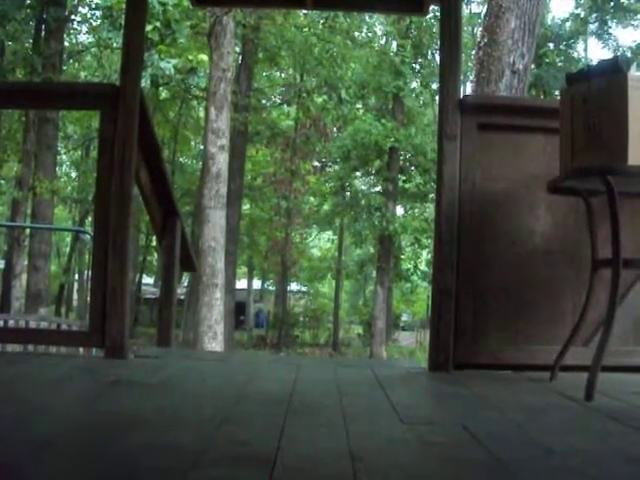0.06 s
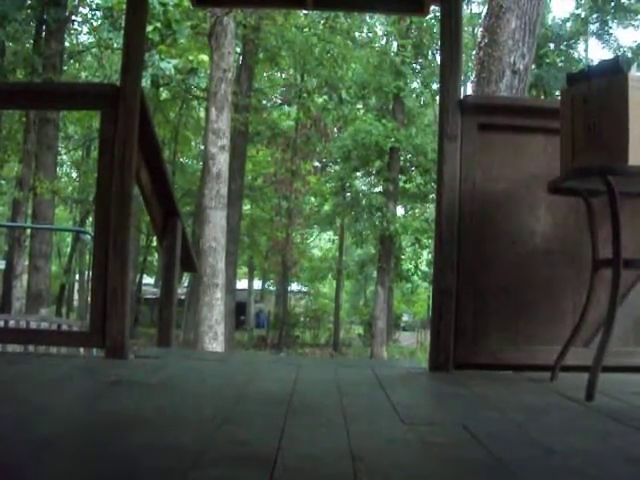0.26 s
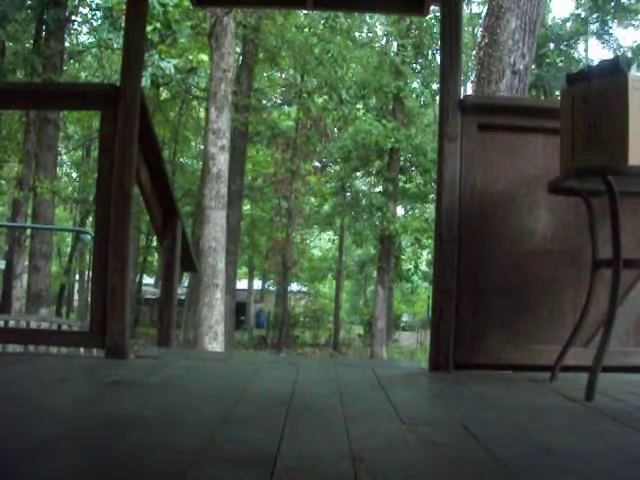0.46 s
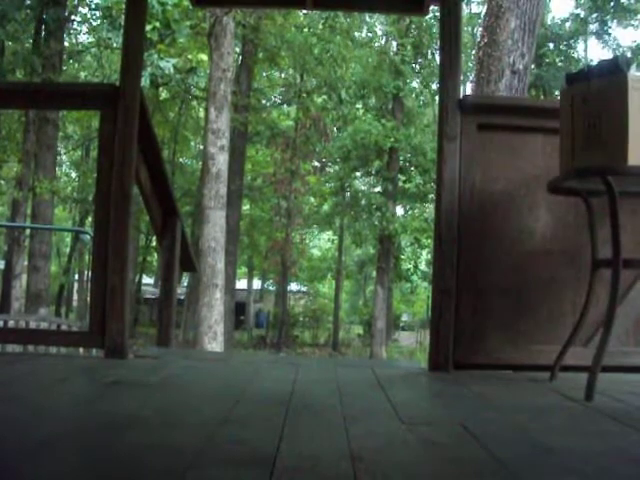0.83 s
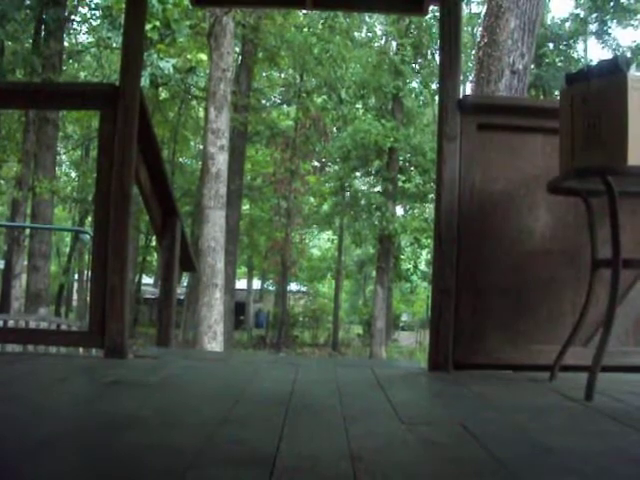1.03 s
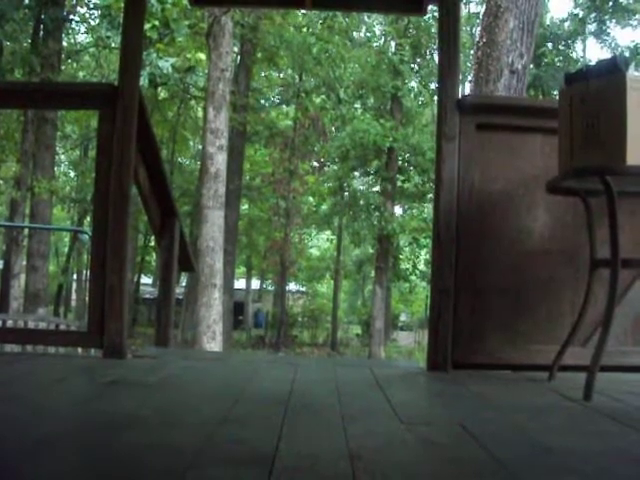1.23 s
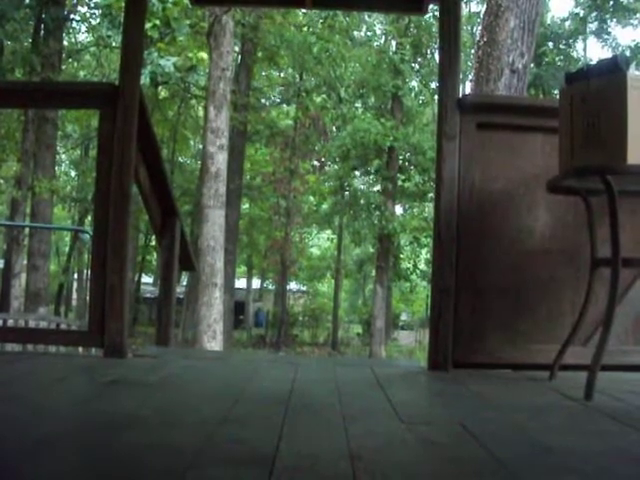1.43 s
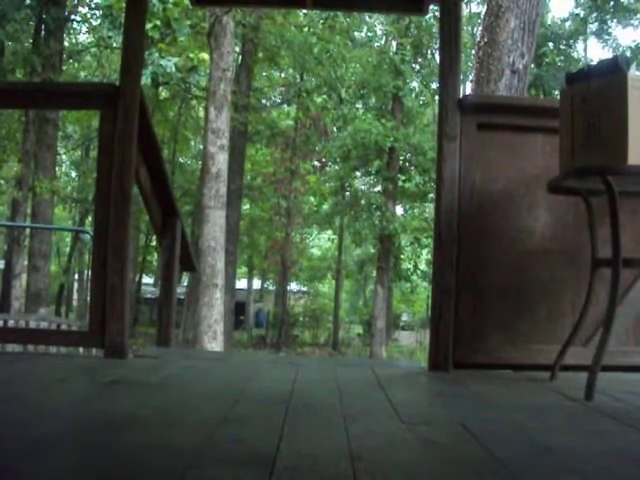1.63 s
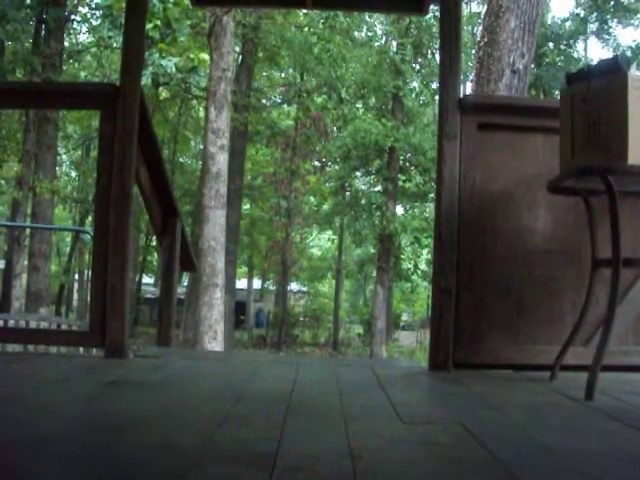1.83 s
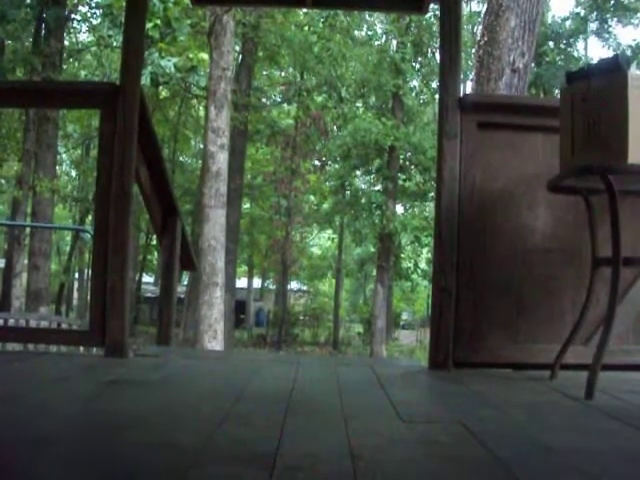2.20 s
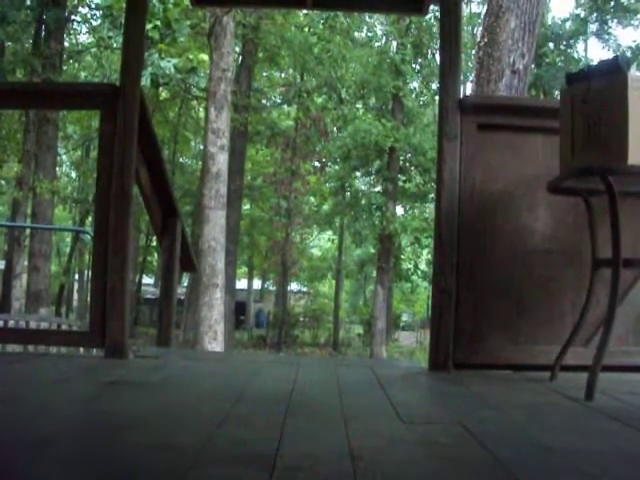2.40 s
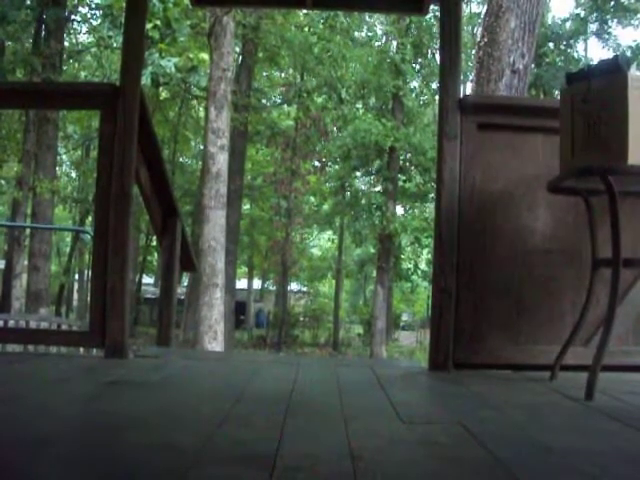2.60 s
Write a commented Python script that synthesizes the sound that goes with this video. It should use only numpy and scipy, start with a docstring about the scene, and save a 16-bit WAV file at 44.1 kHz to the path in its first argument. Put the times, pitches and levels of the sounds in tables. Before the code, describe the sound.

Steady rain washes and patters on trees beyond a porch, sounding dull, with low wind rumble on the microphone. Close rubbing and bumps start at 0.2 seconds. A hard knock at 0.5 seconds overloads and briefly dips the rain. Small taps follow at 1.0 and 1.3. At 1.5 a thump starts a rumbling rub that hisses until 2.2, then a quick swipe and bump come at 2.4.

```python
"""A wooden porch, with steady rain on the trees and yard beyond, heard through a dull little microphone.
Far drops merge into a wash, nearer ones patter, and a draught buffets the microphone.
Right at the microphone the camera is handled: its case knocks and thumps, and something rubs over it,
rumbling and then hissing away. The hardest knock overloads the recorder, whose gain control ducks
the rain for a moment."""
import sys
import numpy as np
from scipy import signal
from scipy.fft import rfft, irfft
from scipy.io import wavfile
from scipy.ndimage import uniform_filter1d

SR = 44100
rng = np.random.default_rng(int(sys.argv[2]) if len(sys.argv) > 2 else 0)


def persist_wave(psi):
    """Save psi, clipped to +-1, as 16-bit WAV."""
    counts = np.round(np.clip(psi, -1, 1) * 32767).astype(np.int16)
    wavfile.write(sys.argv[1], SR, np.atleast_2d(counts).T)


N = 121275
T = np.arange(N) / SR

# Spectra: f/Hz, relative level/dB
DRAUGHT_SPECTRUM = [(10, -13.5), (25, 0.5), (45, 0), (75, -1), (130, -6.5), (220, -20), (500, -52.5)]  # air buffeting the microphone
RAIN_SPECTRUM = [(88, -35.5), (150, -8), (227, -1), (253, -1.5), (309, -4), (333, -3), (360, -2.5),
                 (562, -0.5), (666, -2), (891, -2.5), (978, 0), (1270, -6.5), (1860, -7), (2650, -14.5),
                 (3500, -11), (4980, -18.5), (5900, -27.5), (7670, -66), (13000, -120)]  # far rain on trees and yard
RUMBLE_SPECTRUM = [(20, 11), (60, 3.5), (130, -1.5), (230, -4), (310, -8), (380, -6), (480, -14),
                   (900, -26.5), (1500, -24), (2500, -49)]  # rubbing, heard through the case
HISS_SPECTRUM = [(180, -52.5), (300, -8), (595, 1.5), (718, -1.5), (910, 5), (1080, -3.5), (1310, 1),
                 (1500, -4.5), (1780, 1.5), (2150, -8.5), (2380, -2.5), (2620, -8), (4490, -10),
                 (5340, -21), (5900, -35.5), (7670, -73), (13000, -120)]  # friction on its surface
SWIPE_SPECTRUM = [(200, -9), (600, -18), (1200, 6), (1900, 4), (2800, 3), (4000, -0.5), (5200, -3.5),
                  (6000, -18)]  # a brighter swipe
RATTLE_SPECTRUM = [(80, -0.5), (300, -4.5), (600, 14), (1000, -5.5), (1800, -9.5), (2300, -14),
                   (3500, -2.5), (5500, -9.5)]  # the case rattling after a knock

# Rumble of each rubbing stroke: bass cut-off f/Hz, curve of (t/s, level/dB)
RUMBLE_STROKES = [(120, [(0, -21), (.04, -28), (.07, -56)]), (25, [(.15, -26), (.2, -31.5), (.225, -15.5),
                  (.28, -20.5), (.335, -18.5), (.37, -26.5), (.42, -56)]), (70, [(.57, -29), (.615, -26),
                  (.68, -41.5), (.8, -30.5), (.9, -56.5)]), (111, [(1.475, -13.5), (1.487, -8),
                  (1.53, -8.5), (1.56, -16.5), (1.6, -13.5), (1.63, -23.5), (1.8, -32), (2.05, -32.5),
                  (2.2, -31), (2.26, -56)]), (50, [(2.4, -27), (2.42, -20.5), (2.47, -30.5),
                  (2.52, -44.5)])]
# Hiss of the rubbing, one curve a stroke: t/s, level/dB
HISS_STROKES = [
    [(.19, -43), (.21, -21), (.23, -32), (.27, -27), (.30, -36), (.32, -27), (.39, -38.5)],
    [(.60, -52), (.615, -25), (.65, -40.5), (.72, -46), (.80, -34.5), (.87, -37), (.92, -60)],
    [(1.52, -36.5), (1.562, -33), (1.6, -21), (1.616, -27.5), (1.648, -27.5), (1.684, -15), (1.698, -25),
     (1.758, -25.5), (1.81, -23.5), (1.95, -26.5), (2.118, -30), (2.16, -48)],
    [(2.19, -52), (2.216, -26.5), (2.236, -43)],
]
# Hiss of the last quick swipe: t/s, level/dB
LAST_SWIPE = [(2.405, -53), (2.425, -27), (2.445, -30.5), (2.48, -26), (2.492, -54)]
# Soft blows that rock the camera: t/s, level/dB, f/Hz, rise time/s
SOFT_BLOWS = [(0.227, -23.5, 210, .005), (0.304, -14, 125.2, .008), (0.368, -16, 28, 0.01),
              (.514, -4, 41, 0.015), (0.5249, -3, 101.8, 0.0081), (1.098, -18.5, 106, 0.0088),
              (1.4802, -4, 162, 0.0036), (1.504, -14, 239, 0.013), (1.568, -18, 58.8, 0.013),
              (2.182, -18, 180, 0.0023), (2.408, -9.5, 72.5, 0.0092)]
# Modes of the camera case: f/Hz, level/dB, t60/s
CASE_MODES = [(388, -8, 0.028), (550, -18, 0.097), (762, -14, .035), (862, -6, 0.02), (1037, -10.5, 0.045),
              (1232, -10.5, .03), (1721, -3.5, 0.017), (2476, -21, 0.023), (2930, -13.5, 0.022),
              (3260, -10.5, 0.015), (4380, -9.5, 0.0063), (5250, -13, 0.01)]
# Knocks on the case: t/s, level/dB, brightness f/Hz, rattle decay time/s
CASE_KNOCKS = [(0.2058, -15, 4050, 0.0053), (0.309, -16.5, 1040, 0.0038), (0.359, -22.5, 5000, .008),
               (0.521, -9.5, 2200, 0.0058), (.5342, 5.5, 1987, 0.0058), (1.0061, -12, 3570, 0.0031),
               (1.3195, -14, 1520, 0.0058), (1.4788, -7, 1086, 0.0053), (1.599, -16.5, 2470, 0.0011),
               (2.181, -21, 355, 0.0013), (2.261, -24, 1800, 0.0066)]


def amp(db):
    """Decibels to gain."""
    return 10 ** (np.asarray(db) / 20)


def unit(x):
    """Scales to an rms of 1."""
    return x / np.sqrt(np.mean(x ** 2) + 1e-20)


def colour(x, spectrum):
    """Shapes a sound by a spectrum drawn on a log-frequency axis, at an rms of 1."""
    hz, db = np.transpose(spectrum)
    bin_hz = np.fft.rfftfreq(len(x), 1 / SR)
    gain = amp(np.interp(np.log(bin_hz + 1), np.log(hz + 1), db))
    return unit(irfft(rfft(x) * gain, len(x)))


def wander(hz):
    """Random motion slower than hz, at an rms of 1."""
    bin_hz = np.fft.rfftfreq(N, 1 / SR)
    return unit(irfft(rfft(rng.standard_normal(N)) / (1 + (bin_hz / hz) ** 4), N))


def add(mix, start_s, sound):
    """Mixes a sound in at a time."""
    part = mix[max(round(start_s * SR), 0):][:len(sound)]
    part += sound[:len(part)]


def low_pass(x, hz):
    """A steep treble cut."""
    taps = signal.firwin(181, hz, window=("kaiser", 8), fs=SR)
    return signal.oaconvolve(x, taps[None], "same")


def far_rain(db=-33.5, patch_db=2, flicker_db=0.3):
    """Out in the trees and yard, countless drops merge into a wash with drifting patches."""
    _, _, spectrogram = signal.stft(rng.standard_normal(N), SR, nperseg=512)
    patches = uniform_filter1d(rng.standard_normal(spectrogram.shape), size=7, axis=0)  # across pitch
    patches = unit(uniform_filter1d(patches, size=10, axis=1))  # across time
    wash = signal.istft(spectrogram * amp(patch_db * patches), SR)[1][:N]
    return amp(db + flicker_db * wander(hz=23)) * colour(wash, RAIN_SPECTRUM)


def near_drops(db=-41, drops_per_s=1100, spread_db=1.5, decay_cycles=3.5, pitches=24):
    """Closer to the porch, drops patter on leaves and boards, each ringing for a few cycles."""
    t = np.arange(SR // 40) / SR
    patter = np.zeros(N)
    for hz in np.geomspace(700, 5000, pitches):
        sizes = amp(spread_db * np.minimum(rng.exponential(1, N), 4))
        lands = rng.random(N) < drops_per_s / pitches / SR
        ping = np.sin(2 * np.pi * hz * t) * np.exp(-t * hz / decay_cycles)
        patter += signal.oaconvolve(sizes * lands, ping)[:N]
    return amp(db) * unit(patter)


def draught(db=-33.5, gust_db=4):
    """Air buffets the microphone with a low, lumpy rumble."""
    return amp(db + gust_db * wander(hz=12)) * colour(rng.standard_normal(N), DRAUGHT_SPECTRUM)


def friction(strokes, spectrum, grain_db):
    """A rubbed surface slips unevenly, following the strength of each stroke."""
    slips = rng.standard_normal(N) * amp(grain_db * wander(hz=250))
    strength = sum(amp(np.interp(T, *np.transpose(curve), left=-120, right=-120)) for curve in strokes)
    return colour(slips, spectrum) * strength


def rubbing(hiss_grain_db=-0.83, rumble_grain_db=3.5):
    """Something rubs over the camera: the surface hisses and the case rumbles."""
    hiss = amp(-0.5) * friction(HISS_STROKES, HISS_SPECTRUM, hiss_grain_db)
    swipe = friction([LAST_SWIPE], SWIPE_SPECTRUM, hiss_grain_db)
    rumble = np.zeros(N)
    for cut_hz, curve in RUMBLE_STROKES:
        bass_cut = signal.butter(2, cut_hz, "high", fs=SR)
        rumble += signal.lfilter(*bass_cut, friction([curve], RUMBLE_SPECTRUM, rumble_grain_db))
    return hiss + swipe + rumble


def thump(db, hz, rise_s):
    """A soft blow rocks the camera in a few slow swings that swell and die."""
    t = np.arange(SR // 4) / SR
    swell = t / rise_s * np.exp(1 - t / rise_s)
    return amp(db) * swell * np.sin(2 * np.pi * hz * t)


def knock(db, bright_hz, rattle_s, rattle_db=-4.5, contact_q=1.79):
    """A blow rings and rattles the case; the springy contact stresses bright_hz and dulls the top."""
    t = np.arange(SR // 8) / SR
    ring = sum((-1) ** k * amp(mode_db - 60 * t / t60) * np.sin(2 * np.pi * hz * t)
               for k, (hz, mode_db, t60) in enumerate(CASE_MODES))
    rattle = amp(rattle_db) * colour(rng.standard_normal(len(t)), RATTLE_SPECTRUM) * np.exp(-t / rattle_s)
    ratio = np.fft.rfftfreq(2 * len(t), 1 / SR) / bright_hz
    contact = 1 / (1 - ratio ** 2 + 1j * ratio / contact_q)
    return amp(db) * irfft(rfft(ring + rattle, 2 * len(t)) * contact)[:len(t)]


def handling():
    """Rubbing, knocks and thumps on the camera, right at the microphone."""
    mix = rubbing()
    for start_s, *blow in CASE_KNOCKS:
        add(mix, start_s, knock(*blow))
    for start_s, *blow in SOFT_BLOWS:
        add(mix, start_s, thump(*blow))
    return mix


def scene():
    """From the porch, in mono: rain at a distance, draught and handling up close."""
    return (far_rain() + near_drops() + draught() + handling())[None]


def record(dry, mic_edge_hz=5850, limit_db=-10.5, react_s=0.0069, recover_db_per_s=38, clip_at=0.71):
    """A dull microphone feeds a gain control that falls fast and recovers slowly; the top peaks clip."""
    heard = low_pass(dry, mic_edge_hz)
    power_db = 10 * np.log10(abs(uniform_filter1d(heard[0] ** 2, size=220)) + 1e-12)
    recovery_db = T * recover_db_per_s
    held_db = np.maximum.accumulate(power_db + recovery_db) - recovery_db  # each peak ebbs slowly
    over_db = np.maximum(held_db - limit_db, 0)
    pole = np.exp(-1 / (react_s * SR))
    ducked = heard * amp(-signal.lfilter([1 - pole], [1, -pole], over_db))
    excess = ducked - np.clip(ducked, -clip_at, clip_at)
    in_band = low_pass(excess, mic_edge_hz)
    overtones = amp(-11) * (excess - in_band)  # distortion above the microphone's range is muted
    return low_pass(ducked - in_band - overtones, hz=15600)


dry = scene()
out = record(dry)
persist_wave(out)
```